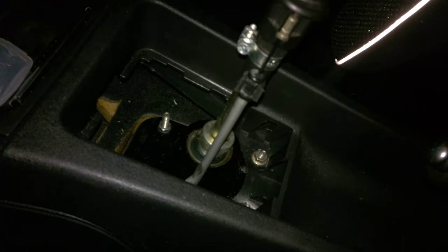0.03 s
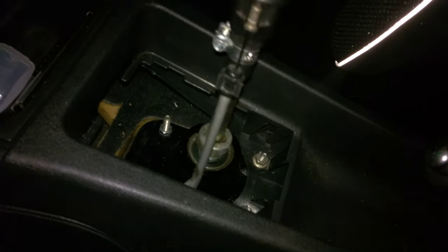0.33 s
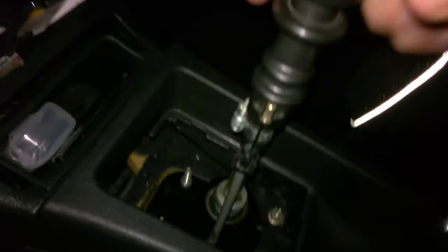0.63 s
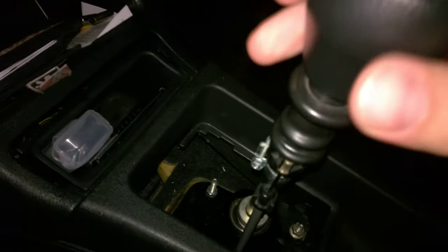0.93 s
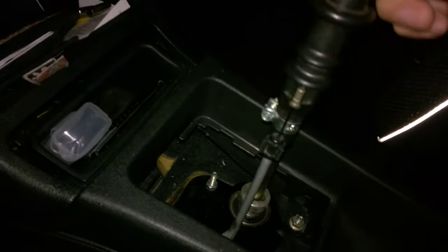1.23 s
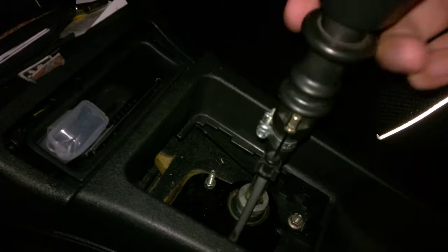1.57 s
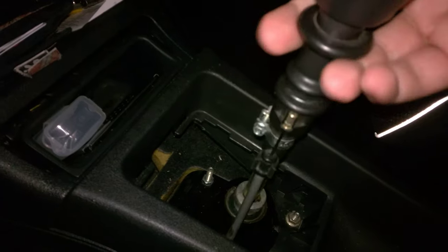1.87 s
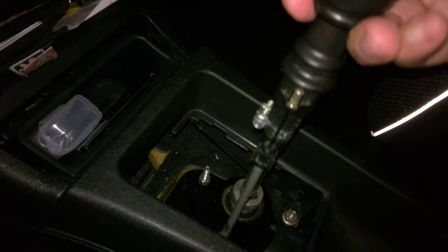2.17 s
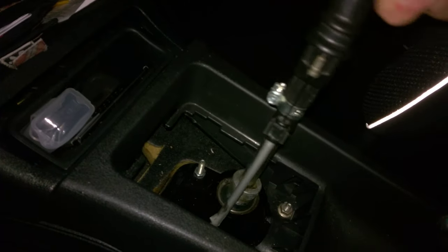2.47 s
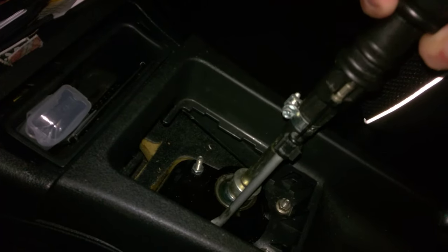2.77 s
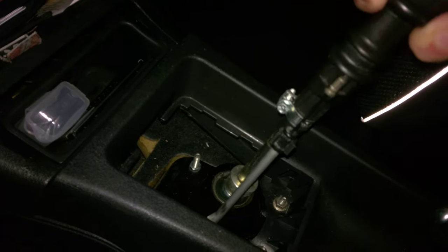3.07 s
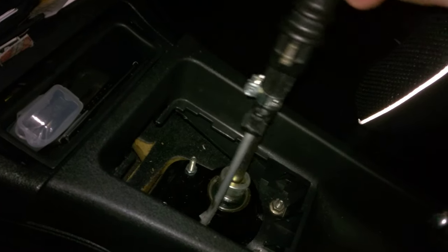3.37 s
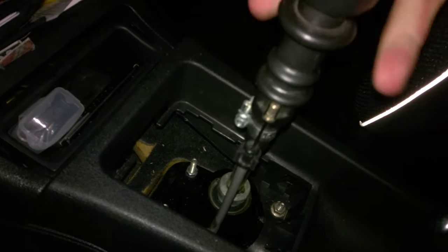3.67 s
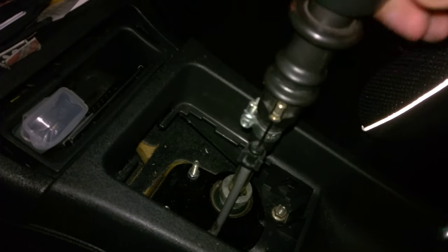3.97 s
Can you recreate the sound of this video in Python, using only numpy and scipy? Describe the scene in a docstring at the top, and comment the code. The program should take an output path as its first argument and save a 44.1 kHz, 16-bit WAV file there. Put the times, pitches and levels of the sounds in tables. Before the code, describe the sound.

A gear lever clunks and clicks through its gears over a faint low rumble.

```python
"""A bare gear lever, worked by hand through its gate inside a parked car. Each stop knocks the linkage,
thumps the rubber mount and shakes console, trim and floor. Loose steel joints chatter in quick clicks,
the lever rubs along the gate, and one nudge rings a panel. Faint rumble, hum, hiss and whine lie beneath.
The car is on the right channel; the left carries idle noise and a trace of crosstalk."""
import sys
import numpy as np
from scipy.fft import rfft, irfft, next_fast_len
from scipy.io import wavfile
from scipy.ndimage import map_coordinates

SR = 44100
rng = np.random.default_rng(int(sys.argv[2]) if len(sys.argv) > 2 else 0)


def digitize_waveform(pressure):
    """Quantize a signal to 16-bit integers and store it at the path in sys.argv[1].

    Rows of a 2-D input are taken as channels; values are limited to [-1, 1].
    """
    field = np.atleast_2d(pressure).T
    bounded = np.clip(field, -1, 1)
    quanta = np.round(bounded * 32767).astype(np.int16)
    wavfile.write(sys.argv[1], SR, quanta)


N = 176400
EVENT_T_S = np.arange(int(0.7 * SR)) / SR

# Lever stops. Each row: start in seconds, then relative levels in dB of gate, floor, mount, console, trim.
STOPS = [(.283, -29, -15, -32.5, -22, -41), (.318, -40, -24, -37, -30.5, -49),
         (.394, -34, -50, -44, -35.5, -52), (0.474, -16, -32, -42, -22, -31.5),
         (.497, -42, -22.5, -53, -22, -37), (.815, -44, -59, -48.5, -35.5, -57),
         (.952, -37, -24, -19, -27, -46), (.972, -40, -33.5, -53, -32.5, -50.5),
         (1.163, -18, -23.5, -26, -13, -32.5), (1.253, -42, -19, -19.5, -25, -52.5),
         (1.267, -38.5, -40, -31, -27.5, -52.5), (1.403, -45, -40, -47, -39.5, -72.5),
         (1.470, -19, -39, -30, -22.5, -27.5), (1.483, -39, -19.5, -50, -21.5, -51),
         (1.681, -43, -58, -59, -48, -54), (1.753, -41, -30.5, -57, -48, -49),
         (1.923, -38.5, -34, -50, -41.5, -57.5), (1.972, -38.5, -28, -34, -32.5, -51),
         (2.008, -26, -32, -34.5, -24, -33), (2.052, -37, -55, -43, -37, -52),
         (2.318, -31, -21.5, -15.5, -24, -39), (2.522, -48, -26, -33, -38, -60),
         (2.554, -51, -30, -34, -42.5, -67), (2.667, -48, -22, -38, -36, -57),
         (2.719, -35, -36, -35, -27.5, -58), (3.133, -43.5, -51.5, -63, -42, -58),
         (3.457, -56, -25, -40, -39, -65), (3.542, -37.5, -47, -41, -29, -54),
         (3.589, -32.5, -49, -52, -28, -48), (3.622, -13, -30.5, -25.5, -21.5, -23),
         (3.636, -15, -26.5, -42, -18.5, -35), (3.659, -16, -18.5, -48, -17.5, -24),
         (3.672, -21.5, -18.5, -33, -13.5, -36.5), (3.711, -42, -26, -46, -27.5, -39),
         (3.742, -41.5, -17, -35, -36, -58)]
# Steel contacts. Each row: start in seconds, relative level in dB, tilt in dB per octave.
CONTACTS = [(0.279, -39, -17), (0.288, -57, -15.5), (0.291, -50.5, 18), (.436, -45, 4.5), (0.454, -41, 0),
            (0.475, -28.5, -2.5), (0.486, -37, -0.5), (0.491, -33.5, -11), (0.5006, -30.5, 2.5),
            (.508, -36, -0.5), (.533, -40.5, -1), (0.551, -46, -3.5), (1.154, -23.5, -8),
            (1.156, -24.5, -3), (1.163, -21.5, -0.5), (1.169, -24, -5), (1.171, -37, -0.5),
            (1.417, -46.5, -2.5), (1.464, -37.5, -3.5), (1.4687, -23.5, -4.5), (1.476, -30, -7.5),
            (1.4788, -25, 6), (1.484, -24, 0), (1.499, -42, -16), (1.682, -49, -1.5), (1.754, -43, -6.5),
            (1.937, -45, -3), (1.969, -35, 0), (2.006, -19.5, -3.5), (2.01, -40, 9), (2.022, -38, -14.5),
            (2.042, -39, -5.5), (2.317, -37.5, 0.5), (2.562, -44.5, 3), (2.668, -56, -3),
            (2.673, -41, -5.5), (2.775, -50, -4), (3.134, -52.5, -8), (3.269, -45, 1), (3.539, -28, 0),
            (3.622, -10, -12), (3.627, -23, 0.5), (3.631, -36, 0), (3.637, -21, -1.5), (3.645, -25.5, 3),
            (3.652, -29.5, 9), (3.657, -19.5, -5), (3.662, -21.5, -1.5), (3.668, -19, 3),
            (3.674, -27.5, -1), (3.679, -24, 3), (3.689, -42, 9), (3.713, -37.5, -6), (3.742, -44.5, -2.5)]
# Slides along the gate. Each row: start in seconds, length in seconds, relative level in dB.
SLIDES = [(1.939, 0.024, -55), (2.663, .11, -45.5), (3.419, 0.077, -45.5)]

# Modes of each part. Each row: frequency in Hz, relative level in dB, T60 in seconds.
FLOOR_MODES = [(36, -2.5, 0.58), (67.4, 0.5, 0.35), (83.1, -10, 0.36)]
MOUNT_MODES = [(109.7, -14, 0.23), (137.7, -0.5, 0.14), (210.3, -8, .14)]
CONSOLE_MODES = [(216.7, -7, 0.17), (242.5, -6, 0.3), (262.4, -1, 0.23), (283, -4, 0.2), (336.2, -8, 0.11),
                 (378.2, -4, 0.18)]
GATE_MODES = [(455.5, -11.5, 0.24), (495, -4, 0.16), (523.4, -1.5, 0.16), (568.5, -4.5, 0.17),
              (601, -2.5, 0.092), (675.3, -4, 0.094), (715.8, -4, 0.085), (773, -5, 0.088),
              (873.5, -14.5, 0.17)]
TRIM_MODES = [(940, -10.5, 0.14), (1012, 1, 0.12), (1074, -5, 0.15), (1122, -12.5, 0.082),
              (1248, -6, 0.098), (1368, -11, 0.082), (1486, -0.5, 0.06), (1594, -15.5, 0.08),
              (1740, -4, 0.087)]
LINK_MODES = [(1582, -3.5, .06), (1855, -11, 0.078), (2290, -12, .05), (2760, -16, 0.028), (3090, -9, 0.04),
              (3407, -12, 0.035), (4800, -16.5, 0.064), (5970, -16.5, 0.035), (7780, -25.5, 0.076)]
PANEL_MODES = [(350, 0, 0.29)]

# Noise spectra. Each row: frequency in Hz, relative density in dB.
CONSOLE_SPECTRUM = [(120, -15.5), (210, 11), (380, 4), (470, -6.5), (800, -60.5), (3000, -90.5)]
GATE_SPECTRUM = [(280, -42), (450, 11), (740, 20.5), (900, -3.5), (1600, -70.5), (5000, -89.5)]
TRIM_SPECTRUM = [(550, -30.5), (900, 9), (1700, -6), (2200, -13), (3200, -16), (4500, -19.5), (7000, -38),
                 (15000, -73)]
CRACK_SPECTRUM = [(300, -28.5), (900, 5.5), (2000, 1), (3100, 3), (4200, 0), (5900, 1.5), (7500, -10.5),
                  (11000, -14), (12500, -23), (14000, -24), (15700, -34.5)]
TRAIL_SPECTRUM = [(300, -7.5), (900, -10.5), (1800, 0), (3100, -6), (4200, -7), (5800, 0), (7500, -11.5),
                  (11000, -22.5), (15500, -52)]
RUB_SPECTRUM = [(200, 7.5), (700, 7.5), (1050, 4.5), (1400, 2), (1850, 1), (2150, -6), (2450, -4.5),
                (3200, -13.5), (8000, -34)]
RUMBLE_SPECTRUM = [(10, -40.5), (25, -9.5), (37, 5.5), (55, -4), (72, -2), (100, -13.5), (180, -20.5),
                   (280, -23.5), (450, -35), (800, -45.5), (1500, -61), (4000, -94)]
HISS_SPECTRUM = [(100, 18), (1200, 1.5), (3300, 1.5), (5500, -5.5), (8000, -12.5), (11000, -13.5),
                 (15500, -13)]
IDLE_SPECTRUM = [(20, -4), (40, -24), (60, -4), (80, -1), (110, -22), (200, -26.5), (500, -34.5),
                 (1000, -42), (4500, -48.5), (8000, -57), (15500, -54)]

# Background envelopes. Each row: time in seconds, relative level in dB.
RUMBLE_ENVELOPE = [(0.0, -37), (0.26, -46), (0.47, -29.5), (0.68, -41.5), (0.91, -42.5), (1.14, -38),
                   (1.44, -36.5), (1.75, -44), (2.36, -40.5), (2.57, -36), (3.09, -45.5), (3.31, -43.5),
                   (3.64, -29.5), (4.0, -42.5)]
HISS_ENVELOPE = [(0, -75.5), (.3, -71.5), (.6, -70.5), (.75, -69.5), (1.0, -71), (1.35, -70.5),
                 (1.7, -72.5), (2.25, -72.5), (2.4, -70.5), (2.6, -70), (2.9, -70), (3.5, -73.5),
                 (3.75, -71), (4, -74.5)]


def lever_knocks():
    """Each stop shakes five parts; floor and mount swell slowest, and the floor rings longest."""
    out = np.zeros(N)
    for start_s, gate_db, floor_db, mount_db, console_db, trim_db in STOPS:
        floor = ring(FLOOR_MODES, attack_s=0.022)
        mount = ring(MOUNT_MODES, attack_s=0.027)
        console = ring(CONSOLE_MODES, attack_s=0.0042)
        console += amp(-4) * wash(CONSOLE_SPECTRUM, attack_s=0.0026, t60_s=0.24)
        gate = ring(GATE_MODES, attack_s=0.00072)
        gate += amp(-4) * wash(GATE_SPECTRUM, attack_s=0.002, t60_s=0.2)
        trim = ring(TRIM_MODES, attack_s=0.0055)
        trim += amp(2) * wash(TRIM_SPECTRUM, attack_s=0.0023, t60_s=0.14)
        add(out, start_s, amp(floor_db + 6) * floor)
        add(out, start_s, amp(mount_db + 20) * mount)
        add(out, start_s, amp(console_db + 4.5) * console)
        add(out, start_s, amp(gate_db - 2.5) * gate)
        add(out, start_s, amp(trim_db - 1.5) * trim)
    return out


def joint_clicks():
    """Steel on steel: short crack, duller cabin trail, damped ring of the link."""
    out = np.zeros(N)
    for start_s, level_db, tilt_db_oct in CONTACTS:
        crack = noise(CRACK_SPECTRUM, len(EVENT_T_S), tilt_db_oct) * decay(attack_s=0.00038, t60_s=0.014)
        trail = noise(TRAIL_SPECTRUM, len(EVENT_T_S), tilt_db_oct) * decay(attack_s=0.0065, t60_s=0.065)
        link = ring(LINK_MODES, attack_s=0.0011)
        add(out, start_s, amp(level_db) * (crack + amp(-13.5) * trail + amp(-10) * link))
    return out


def panel_nudge(start_s=3.14, level_db=-31):
    """A light nudge leaves one console panel ringing."""
    out = np.zeros(N)
    add(out, start_s, amp(level_db) * ring(PANEL_MODES, attack_s=0.0072))
    return out


def gate_rubs(roughness_db=1.84):
    """Dry, uneven friction of lever on gate: abrupt start, then easing off."""
    out = np.zeros(N)
    for start_s, length_s, level_db in SLIDES:
        onset = np.minimum(EVENT_T_S / 0.003, 1)
        release = np.sqrt(np.clip(1 - EVENT_T_S / length_s, 0, 1))
        add(out, start_s, amp(level_db) * onset * release * noise(RUB_SPECTRUM, len(EVENT_T_S)))
    return out * amp(roughness_db * wobble(rate_hz=220))


def cabin_background(hum_hz=239.8, whine_hz=13270, whine_start_s=0.31):
    """Low rumble, wavering hum, hiss and a thin whine."""
    t_s = np.arange(N) / SR
    rumble = amp(curve(RUMBLE_ENVELOPE) + 9) * noise(RUMBLE_SPECTRUM, N)
    hum_db = -44.5 + 0.69 * wobble(rate_hz=10.01)
    hum = amp(hum_db) * np.sin(2 * np.pi * hum_hz * t_s + 0.21 * wobble(rate_hz=7.5))
    hiss = amp(curve(HISS_ENVELOPE) + 9) * noise(HISS_SPECTRUM, N)
    whine_phase_rad = 2 * np.pi * np.cumsum(whine_hz + 35 * wobble(rate_hz=3)) / SR
    whine = amp(-87) * (t_s > whine_start_s) * np.sin(whine_phase_rad)
    return rumble + hum + hiss + whine


def ring(modes, attack_s):
    """Struck part. The contact point shifts, so each blow excites the modes a little differently."""
    out = np.zeros(len(EVENT_T_S))
    scatter = rng.standard_normal((len(modes), 3)) * [1.5, 0.01, np.pi]
    for (mode_hz, level_db, t60_s), (offset_db, detune, phase_rad) in zip(modes, scatter):
        tone = np.sin(2 * np.pi * mode_hz * (1 + detune) * EVENT_T_S + phase_rad)
        out += amp(level_db + offset_db) * decay(attack_s, t60_s) * tone
    return out


def wash(spectrum, attack_s, t60_s):
    """Dense small resonances and cabin reflections after a blow."""
    return noise(spectrum, len(EVENT_T_S)) * decay(attack_s, t60_s)


def decay(attack_s, t60_s):
    """Quick rise, exponential fall."""
    return (1 - np.exp(-EVENT_T_S / attack_s)) * np.exp(-np.log(1000) * EVENT_T_S / t60_s)


def noise(spectrum, size, tilt_db_oct=0):
    """Shaped noise, rms 1."""
    octave = np.log2(np.fft.rfftfreq(size, 1 / SR) + 1)
    hz, db = np.transpose(spectrum)
    gain = amp(np.interp(octave, np.log2(hz + 1), db) + tilt_db_oct * octave)
    shaped = irfft(rfft(rng.standard_normal(size)) * gain, size)
    return shaped / np.sqrt(np.mean(shaped ** 2) + 1e-20)


def wobble(rate_hz):
    """Smooth curve through random knots."""
    return map_coordinates(rng.standard_normal(N // 100), [np.arange(N) * rate_hz / SR], mode="mirror")


def curve(rows):
    """Breakpoints to one value per sample."""
    return np.interp(np.arange(N) / SR, *np.transpose(rows))


def amp(db):
    """Decibels to gain."""
    return 10 ** (np.asarray(db) / 20)


def add(track, start_s, sound):
    """Mix a sound into the track in place."""
    part = track[round(start_s * SR):][:len(sound)]
    part += sound[:len(part)]


def scene(idle_db=-59, crosstalk_db=-72):
    """Car on the right; idle noise and crosstalk on the left."""
    car = lever_knocks() + joint_clicks() + panel_nudge() + gate_rubs() + cabin_background()
    left = amp(idle_db) * noise(IDLE_SPECTRUM, N) + amp(crosstalk_db) * car
    return np.array([left, car])


def record(dry):
    """Brick-wall low-pass."""
    cutoff_hz = 15800
    size = next_fast_len(N + SR // 2)
    passband = np.fft.rfftfreq(size, 1 / SR) < cutoff_hz
    return irfft(rfft(dry, size) * passband, size)[:, :N]


dry = scene()
out = record(dry)
digitize_waveform(out)
```